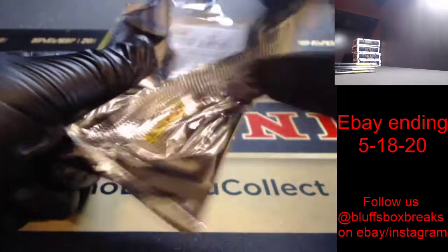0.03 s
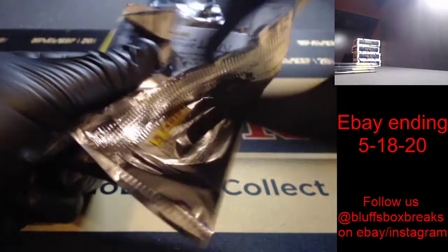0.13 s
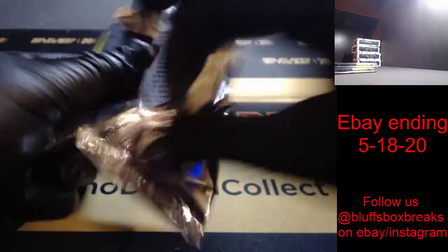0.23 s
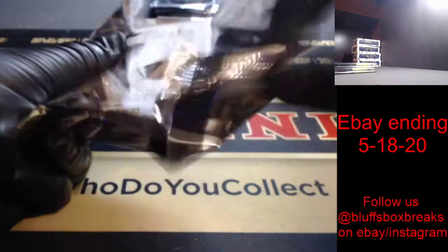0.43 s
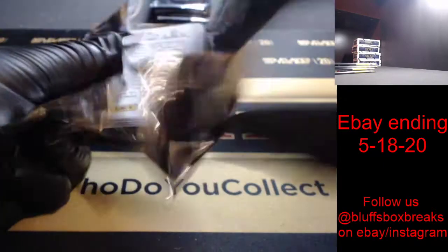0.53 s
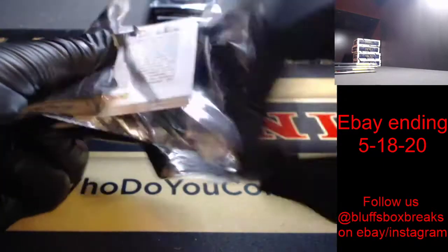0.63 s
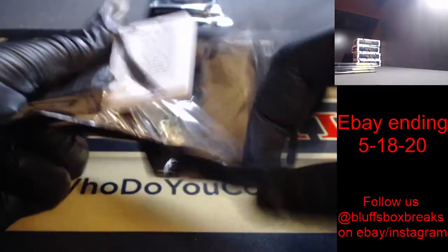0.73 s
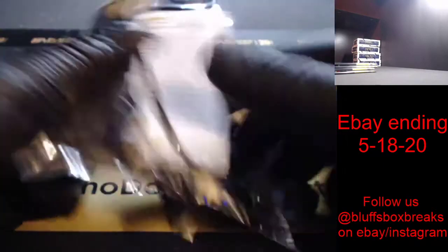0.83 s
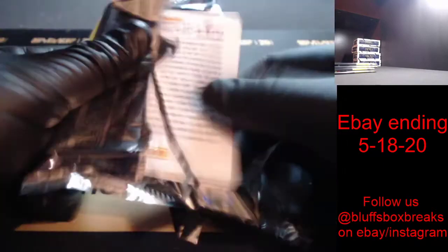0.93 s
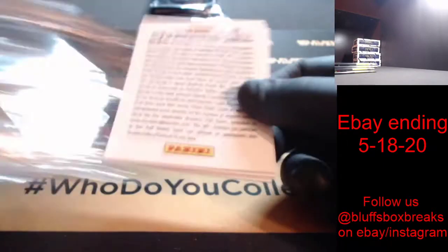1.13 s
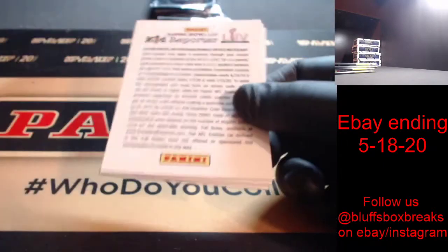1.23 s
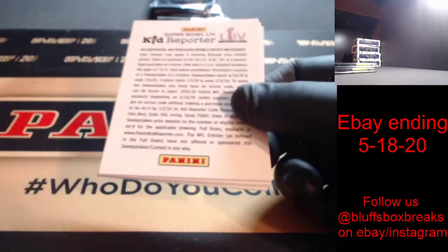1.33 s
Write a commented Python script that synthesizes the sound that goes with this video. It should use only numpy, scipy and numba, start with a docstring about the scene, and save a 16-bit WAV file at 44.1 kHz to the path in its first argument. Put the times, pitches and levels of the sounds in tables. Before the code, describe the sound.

Close-up foil wrapper tearing in a small room, starting with tiny crackles, swelling to a loud crunchy rip, snapping twice more, then dropping to light ticks, faint rubbing and dull bumps over low rumble.

```python
"""A faint crackle first, then a dense rip: gloved hands tear a foil card pack open at a desk mic in a small
room. Crackle, creases that snap, broad folds that pop and rubbing gloves are flurries of short decaying sine
grains. Hard cracks are single swings; resonances ring along as peak filters on the foil. Hands thud the desk
(low decaying sines); filtered noise makes the low room rumble under it all."""
import sys
import numpy as np
from scipy import signal
from scipy.fft import rfft, irfft
from scipy.io import wavfile
from numba import njit

SR = 44100
rng = np.random.default_rng(int(sys.argv[2]) if len(sys.argv) > 2 else 0)


def wav_record(signal):
    """Record a signal, one row per channel, as 16-bit PCM in the file named by sys.argv[1]."""
    frames = np.transpose(np.atleast_2d(signal))
    bounded = np.clip(frames, -1, 1)
    # unit amplitude maps onto the largest positive 16-bit level
    quanta = np.round(bounded * 32767).astype(np.int16)
    wavfile.write(sys.argv[1], SR, quanta)


N = 61739  # samples, 1.4 s

# Levels are relative, ahead of pack resonances, room and mic.
# Foil crackle: t/s, level/dB in low, mid, high band, left minus right/dB
CRACKLE_TRACK = [(0.0, -55, -64, -48, 1), (0.062, -60.5, -54.5, -70, 1.5), (0.158, -46, -61, -44, 4.5),
                 (0.214, -43, -21, -25, 3.5), (0.256, -36.5, -32, -18, 1.5), (0.284, -25, -22.5, -27, 3),
                 (0.334, -26.5, -15.5, -15, 2), (0.376, -32, -21.5, -10, 1), (0.436, -42.5, -28.5, -58, 2),
                 (0.49, -39.5, -29, -25.5, -1), (0.54, -35.5, -51, -38, 3), (0.634, -27.5, -41, -29.5, 1.5),
                 (0.75, -68.5, -55.5, -60, 3.5), (0.992, -54.5, -60, -49.5, 3), (1.05, -53, -56.5, -57, 0),
                 (1.144, -67.5, -60.5, -69, 1.5), (1.4, -58.5, -81.5, -98, 3.5)]
# Centres of the crackle's low, mid, high band: f/Hz
CRACKLE_BAND_HZ = (700, 2300, 5300)
# Hard full-range cracks: t/s, peak level/dB, f/Hz
CRACK_EVENTS = [(0.2494, 1.5, 2200), (0.2905, -7.5, 544), (0.3205, -3.5, 450), (0.365, -4.5, 350),
                (0.4788, -7, 2000), (0.4797, -5, 450), (0.481, -3.5, 3000), (0.5015, -12.5, 2500),
                (0.5812, -8, 2500), (0.5973, -9, 500), (0.6241, -2, 1900)]
# Creases that snap: t/s, tick level/dB, f/Hz, length/s, pitch spread/octaves
SNAP_EVENTS = [(.001, -26, 2050, 0.024, 0.1), (0.027, -37, 2240, 0.014, 0.31),
               (0.119, -44, 3500, 0.004, 0.8), (0.143, -27.5, 4500, 0.0092, 0.085),
               (.1645, -18.5, 2760, 0.011, 0.063), (0.196, -12.5, 3900, 0.013, 0.48),
               (0.228, -7.5, 2920, 0.026, 0.56), (0.2522, -5.5, 3920, 0.02, 0.39),
               (0.275, -11.5, 4460, 0.0084, 0.36), (0.28, -6.5, 3640, 0.015, 0.34),
               (0.297, -5, 4640, 0.03, 0.17), (.303, -9, 2590, 0.017, 0.46),
               (.320, -5.5, 2070, 0.015, 0.35), (0.342, -6, 2750, 0.012, 0.5),
               (0.35, -3, 1540, 0.016, 0.24), (.358, -2.5, 3380, 0.0081, 0.58),
               (0.37, -4.5, 1746, 0.011, 0.19), (.378, -9.5, 1600, 0.021, 0.39),
               (0.393, -12.5, 1605, 0.036, 0.24), (0.464, -18.5, 3200, 0.0054, 0.22),
               (0.4779, -5, 3580, 0.0064, 0.71), (.4805, -1.5, 5260, 0.0057, 0.13),
               (0.488, -14.5, 5150, 0.0077, 0.092), (.501, -10.5, 4480, 0.0061, 0.32),
               (0.505, -16, 5330, 0.011, 0.28), (0.545, -26, 5030, 0.017, 0.1),
               (0.58, -4.5, 4020, 0.0094, 0.51), (0.594, -11.5, 3500, 0.02, 0.84),
               (0.6142, -1.5, 4380, 0.016, 0.65), (.621, -12, 3600, .008, 0.84),
               (0.629, -14.5, 3050, .016, 0.77), (0.645, -15.5, 3720, 0.014, 0.77),
               (0.692, -27, 2610, 0.029, 0.081), (0.777, -38.5, 3660, 0.028, 0.83),
               (0.829, -38.5, 4640, 0.013, 0.13), (0.851, -23.5, 4810, 0.013, 0.32),
               (.864, -25.5, 4700, 0.0094, 0.076), (0.8762, -16, 5020, 0.0041, 0.061),
               (0.8932, -28, 4670, 0.0055, 0.077), (0.896, -32.5, 4700, 0.016, 0.086),
               (.961, -26.5, 4600, 0.011, 0.47), (.973, -30, 5000, 0.0075, 0.26),
               (1.068, -43.5, 5500, .015, 0.42), (1.349, -38, 6300, 0.013, 0.17)]
# Broad folds that pop: t/s, tick level/dB, f/Hz, length/s, left minus right/dB
POP_EVENTS = [(0.038, -31.5, 712, 0.024, 8), (0.164, -21, 664, 0.024, 11), (0.203, -12.5, 890, 0.022, 10.5),
              (0.228, -11.5, 764, 0.017, 6), (0.251, -10, 600, 0.014, 4.5),
              (0.288, -8.5, 485, 0.0093, 13.5), (0.295, -6, 960, 0.013, 4.5), (0.32, -3.5, 884, 0.017, 5.5),
              (0.365, -1, 648, 0.009, 1), (0.371, 0, 1108, 0.022, 1.5), (0.465, -17.5, 955, 0.02, 8),
              (0.475, -9, 615, 0.0067, -11), (0.501, -10, 888, 0.0087, 3), (0.52, -22.5, 786, 0.01, 6),
              (0.554, -29, 683, 0.022, 15.5), (0.58, -9.5, 850, 0.013, 3), (0.589, -11, 650, 0.0078, 11),
              (0.599, -9, 850, 0.0077, 7), (0.614, -8, 865, 0.015, 14), (0.78, -27.5, 1020, 0.022, 4),
              (0.851, -32, 760, 0.015, 8), (0.89, -33.5, 1160, 0.018, 2)]
# Gloves and cards rubbing: t/s, tick level/dB, f/Hz, length/s, pitch spread/octaves
RUB_EVENTS = [(0.039, -28, 4680, 0.029, 0.24), (0.144, -22, 4400, 0.043, 0.37),
              (1.01, -37, 1145, 0.046, 0.077), (1.008, -45.5, 342, .022, 0.21),
              (1.044, -42.5, 303, 0.045, 0.23), (1.07, -49.5, 745, .032, 0.18),
              (1.107, -43.5, 5560, 0.047, 0.44), (1.347, -44.5, 2880, .075, 1.04)]
# Resonances ringing with the foil: f/Hz, width/Hz, level/dB
RING_MODES = [(735, 28, -3.5), (1218, 33, -2), (1787, 47, -3.5), (7230, 1300, 3.5)]
# Thuds through the desk: t/s, peak level/dB, f/Hz
THUD_EVENTS = [(0.203, -24.5, 123.5), (0.315, -26, 116), (0.359, -19, 127), (0.474, -22, 185),
               (0.587, -20.5, 137.6), (0.693, -37, 140), (0.795, -30, 159.5), (1.094, -32.5, 133.4),
               (1.11, -23.5, 127.2), (1.16, -38, 131), (1.195, -37.5, 162.7), (1.344, -40, 132.8)]
# Rumble spectrum, relative: f/Hz, level/dB per Hz
RUMBLE_SPECTRUM = [(18, -73), (30, -58.5), (60, -23), (128, 1), (273, -16.5), (371, -26), (399, -37),
                   (852, -32), (1110, -60), (2400, -47), (8720, -51), (11300, -90)]

CRACKLE_PER_S, CRACKLE_SCATTER_DB, CRACKLE_CYCLES = 8000, 2, 6
CRACKLE_LOW_HZ, CRACKLE_TOP_HZ = 264, 7560
CRACKLE_TREBLE_BIAS = 0.54  # exponent; under 1: more high ticks
SNAP_TICKS, SNAP_CYCLES, SNAP_SCATTER_DB = 56, 4, 4
POP_TICKS, POP_CYCLES, POP_SCATTER_DB, POP_SPREAD_OCT = 26, 2.6, 2, 0.14
LEAD_SHARE, LEAD_DB = 0.1, -12  # lead-in as share of burst length
FADE_DB, FADE_CURVE = 15.5, 0.41
TICK_SPREAD_DB = 1  # left/right scatter
THUD_RISE_S, THUD_T60_S = 0.014, 0.055
RUMBLE_DB, RUMBLE_WANDER_DB, RUMBLE_WIDTH = -49, 3, 0.1
ROOM_DB, ROOM_T60_S, ROOM_DULL_HZ, ROOM_WIDTH = -9, 0.075, 5460, 0.16
LEFT_OVER_RIGHT_DB = 4.5  # thuds and rumble
MIC_LOW_HZ, MIC_TOP_HZ, TOP_HZ = 93.5, 6670, 8700
CEILING = 0.95  # full scale = 1


def crackle():
    """Foil micro-buckling: dense random ticks of every pitch, a few bigger than the rest."""
    u_gap, u_pitch, u_size, u_sign = rng.random((13000, 4)).T
    t = np.cumsum(-np.log(u_gap)) / CRACKLE_PER_S
    span = CRACKLE_TOP_HZ / CRACKLE_LOW_HZ
    hz = CRACKLE_LOW_HZ * span ** (u_pitch ** CRACKLE_TREBLE_BIAS)
    track = np.array(CRACKLE_TRACK).T
    low, mid, high, pan_db = (np.interp(t, track[0], column) for column in track[1:])
    # band position: 0 low, 1 mid, 2 high
    place = np.interp(np.log(hz), np.log(CRACKLE_BAND_HZ), [0, 1, 2])
    db = np.where(place < 1, low + (mid - low) * place, mid + (high - mid) * (place - 1))
    db = db + 10 * np.log10(CRACKLE_BAND_HZ[1] / CRACKLE_PER_S)  # offset for tick density
    db = db - CRACKLE_SCATTER_DB * np.log(u_size)
    return grains(t, hz, CRACKLE_CYCLES, db, np.sign(u_sign - 0.5), pan_db)


def cracks():
    """One hard swing each, out and back: a Gaussian derivative, peak 1 before gain."""
    t, db, hz = np.array(CRACK_EVENTS).T[:, :, None]
    phase = 2 * np.pi * hz * (np.arange(N) / SR - t)
    swing = -phase * np.exp((1 - phase ** 2) / 2)
    return np.array([np.sum(amp(db + side * lean_db(t)) * swing, axis=0) for side in (0.5, -0.5)])


def snaps():
    """Creases let go in bright tick flurries, leaning 1 dB right of the crackle."""
    t, db, hz, length_s, spread_oct = np.array(SNAP_EVENTS).T[:, :, None]
    return bursts(t, db, hz, length_s, spread_oct, lean_db(t) - 1,
                  SNAP_CYCLES, SNAP_SCATTER_DB, count=SNAP_TICKS)


def pops():
    """Broad folds give lower flurries of shorter grains (in cycles), each from its own side."""
    t, db, hz, length_s, pan_db = np.array(POP_EVENTS).T[:, :, None]
    return bursts(t, db, hz, length_s, POP_SPREAD_OCT, pan_db,
                  POP_CYCLES, POP_SCATTER_DB, count=POP_TICKS)


def rubs():
    """Gloves on cards: soft scuffs of ticks that swell and fall."""
    t, db, hz, length_s, spread_oct = np.array(RUB_EVENTS).T[:, :, None]
    return bursts(t, db, hz, length_s, spread_oct, lean_db(t),
                  SNAP_CYCLES, POP_SCATTER_DB, count=SNAP_TICKS, soft=True)


def resonance(foil):
    """Resonances ring along: narrow peak filters driven by the foil."""
    return sum(amp(db) * signal.lfilter(*signal.iirpeak(hz, hz / width_hz, fs=SR), foil)
               for hz, width_hz, db in RING_MODES)


def thuds():
    """Desk-top knocks: low sines with a linear rise and exponential decay."""
    t, out = np.arange(N) / SR, 0
    for t0, db, hz in THUD_EVENTS:
        age = np.maximum(t - t0 + THUD_RISE_S / 2, 0)  # t0 is mid-rise
        rise = np.minimum(age / THUD_RISE_S, 1)
        decay = amp(-60 * np.maximum(age - THUD_RISE_S, 0) / THUD_T60_S)
        out = out + amp(db) * rise * decay * np.sin(2 * np.pi * hz * age)
    return out


def room(x):
    """Diffuse reflections: convolution with dulled, decaying noise, partly different left and right."""
    t = np.arange(SR // 2) / SR
    mid, side = rng.standard_normal((2, len(t))) * amp(-60 * t / ROOM_T60_S)
    tail = mid + ROOM_WIDTH * side * np.array([[1], [-1]])
    tail = tail / np.sqrt(np.sum(mid ** 2))
    tail = signal.lfilter(*signal.butter(1, ROOM_DULL_HZ, fs=SR), tail)
    return amp(ROOM_DB) * signal.fftconvolve(x, tail, axes=1)[:, :N]


def rumble():
    """Room noise: spectrally shaped, strongest in the bass, wandering in level."""
    hz, db = np.array(RUMBLE_SPECTRUM).T
    gain = amp(np.interp(np.log(np.fft.rfftfreq(N, 1 / SR) + 1), np.log(hz), db))
    mid, side = irfft(rfft(rng.standard_normal((2, N))) * gain, N)
    stereo = (mid + RUMBLE_WIDTH * side * np.array([[1], [-1]])) / mid.std()
    knots = np.arange(0, N + SR, SR // 30)  # 30 level targets per s
    wander = np.interp(np.arange(N), knots, rng.standard_normal(len(knots)))
    return amp(RUMBLE_DB + RUMBLE_WANDER_DB * wander) * stereo


def lean_db(t):
    """Left minus right level of the crackle at time t."""
    track = np.array(CRACKLE_TRACK)
    return np.interp(t, track[:, 0], track[:, -1])


def bursts(t, db, hz, length_s, spread_oct, pan_db, cycles, scatter_db, count, soft=False):
    """Tick flurry around a pitch: faint lead-in, full start, fade; if soft, even swell and fall."""
    u = rng.random((len(t), count, 2))
    g = rng.standard_normal((len(t), count, 3))
    late = (np.arange(count) + u[..., 0]) / count  # share of length
    if soft:
        shape_db = 20 * np.log10(np.sin(np.pi * late) + 1e-9)
    else:
        late = late * (1 + LEAD_SHARE) - LEAD_SHARE
        shape_db = np.where(late < 0, LEAD_DB, -FADE_DB * np.abs(late) ** FADE_CURVE)
    tick_hz = hz * 2 ** (spread_oct * g[..., 0])
    tick_db = db + shape_db + scatter_db * g[..., 1]
    tick_pan_db = pan_db + TICK_SPREAD_DB * g[..., 2]
    return grains(t + late * length_s, tick_hz, cycles, tick_db, np.sign(u[..., 1] - 0.5), tick_pan_db)


def grains(t, hz, cycles, db, sign, pan_db):
    """Panned grains at times t; each dies by 60 dB in three times its audible cycles."""
    hz = np.clip(hz, 50, 0.2 * SR)

    def flat(v):
        return np.ascontiguousarray(np.broadcast_to(v, hz.shape), dtype=float).ravel()

    left = flat(sign * amp(db + pan_db / 2))
    right = flat(sign * amp(db - pan_db / 2))
    return rings(N, flat(t * SR), flat(hz), flat(3 * cycles / hz), left, right, 1. * SR)


@njit
def rings(n, start, hz, t60, left, right, sr):
    """Each grain is a sine that swells for about a cycle and dies away exponentially."""
    out = np.zeros((2, n))
    for k in range(len(start)):
        turn = np.exp(2j * np.pi * hz[k] / sr - np.log(1000) / (t60[k] * sr))
        z = 1 + 0j
        rest_step, rest = np.exp(-3 * hz[k] / sr), 1.  # rest: share of swell still to come
        for i in range(max(int(start[k]), 0), min(int(start[k] + t60[k] * sr), n)):
            out[0, i] += left[k] * z.imag * (1 - rest) ** 2
            out[1, i] += right[k] * z.imag * (1 - rest) ** 2
            z *= turn
            rest *= rest_step
    return out


def amp(db):
    """Level in dB to amplitude factor."""
    return 10 ** (np.asarray(db) / 20)


def scene():
    """Foil with its resonances and room, over left-leaning thuds and rumble."""
    foil = crackle() + cracks() + snaps() + pops() + rubs()
    foil = foil + resonance(foil)
    lean = amp(np.array([[0.5], [-0.5]]) * LEFT_OVER_RIGHT_DB)
    return foil + room(foil) + lean * (thuds() + rumble())


def record(dry):
    """Peaks are rounded; the mic drops deep bass and rolls off the top, then the top is cut."""
    x = CEILING * np.tanh(dry / CEILING)
    x = signal.sosfilt(signal.butter(3, MIC_LOW_HZ, "high", fs=SR, output="sos"), x)
    x = signal.sosfilt(signal.butter(4, MIC_TOP_HZ, fs=SR, output="sos"), x)
    return signal.sosfilt(signal.ellip(8, 0.2, 60, TOP_HZ, fs=SR, output="sos"), x)


dry = scene()
out = record(dry)
wav_record(out)
```